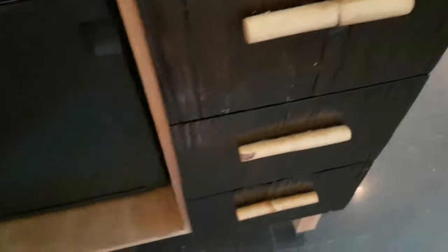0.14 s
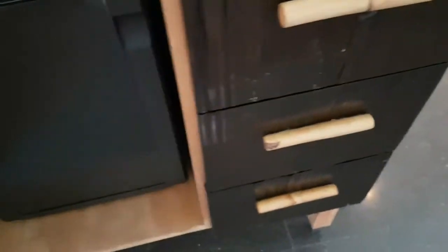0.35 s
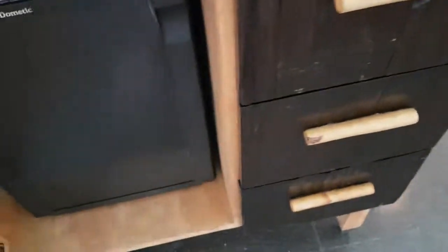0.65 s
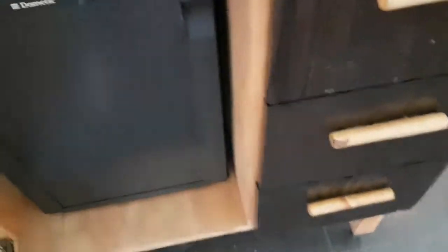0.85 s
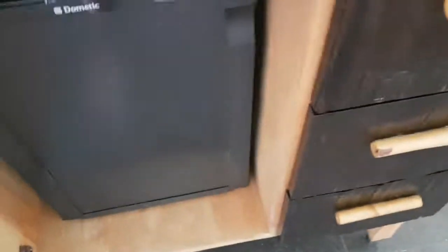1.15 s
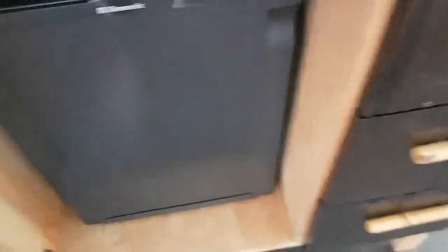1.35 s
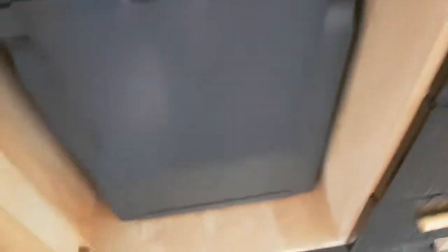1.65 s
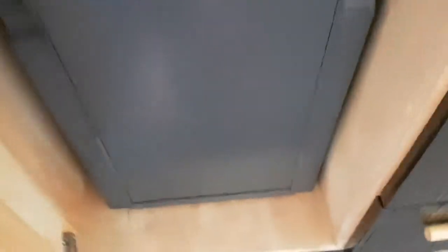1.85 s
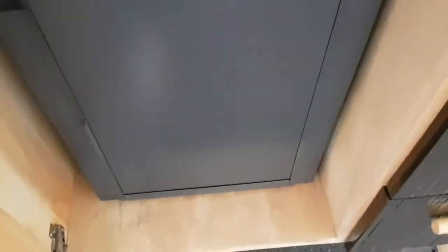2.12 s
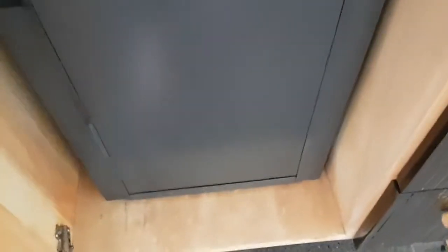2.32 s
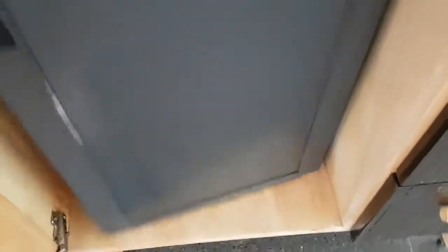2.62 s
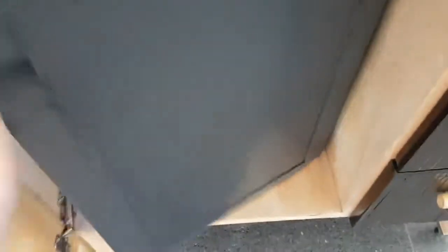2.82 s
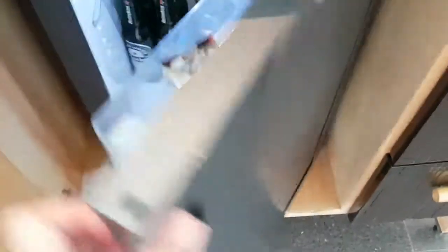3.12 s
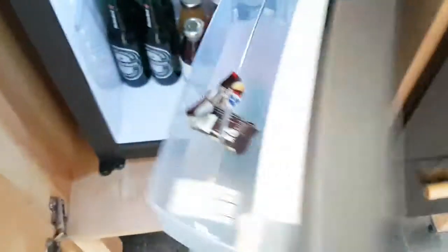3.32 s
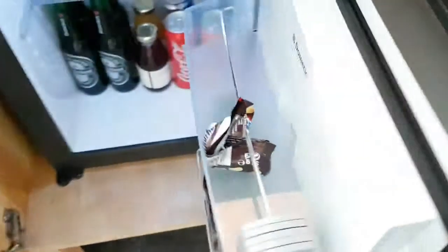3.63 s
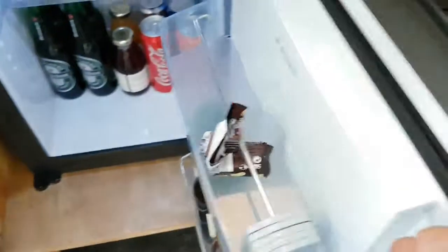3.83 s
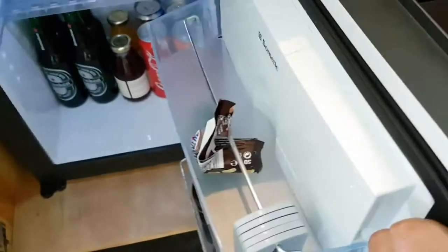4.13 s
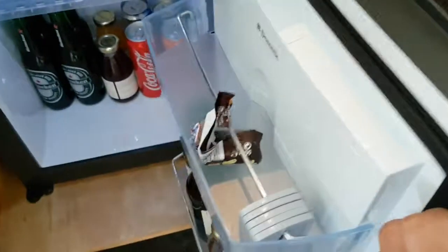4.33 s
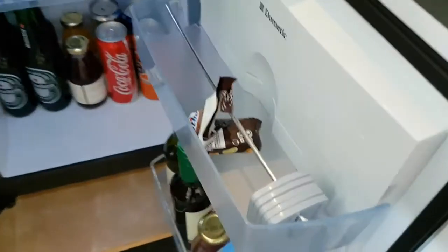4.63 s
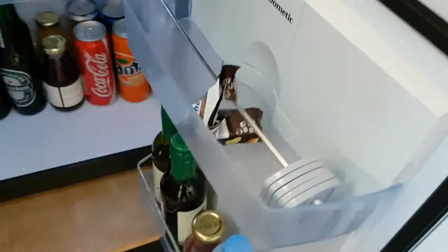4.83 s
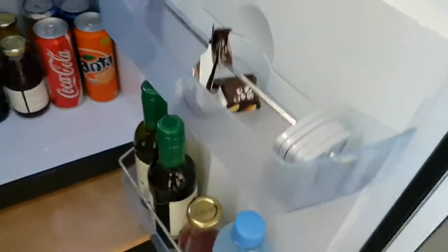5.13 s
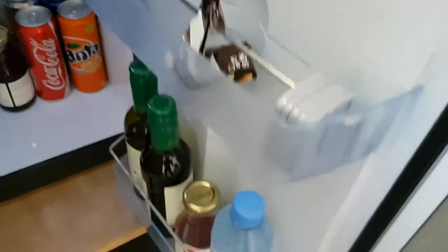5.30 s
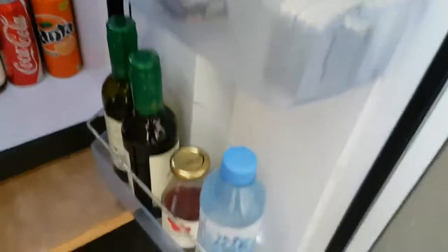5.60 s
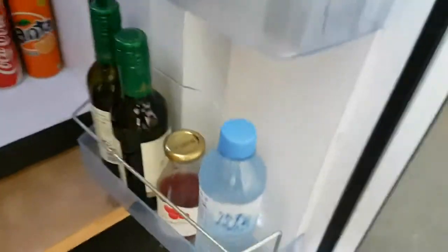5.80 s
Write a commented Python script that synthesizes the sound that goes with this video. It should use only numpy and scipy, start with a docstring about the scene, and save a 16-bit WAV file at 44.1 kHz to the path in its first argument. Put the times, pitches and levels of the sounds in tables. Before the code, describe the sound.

A small furnished room hushes quietly, with sleeve rustle and soft handling rumble close to a hand-held microphone. A hinge squeals faintly at the start and again near 0.9 seconds, where a wooden cabinet judders briefly and gives light knocks and clicks. A louder stuttering creak runs from 1.4 seconds and ends in a knock at 1.6. After another small knock at 2.5, a fridge's rubber seal peels with crackles and short rising squeaks, letting go with a hollow thump at 2.9. Glass bottles tinkle lightly just after, while a sleeve rustles with the swinging door. At about 4.1 seconds the plastic shelves rattle loudly as their load slides and bumps, and at 4.3 bottles meet in a bright, ringing clink. Soft sleeve swishes, a low puff of air and a few faint settling knocks follow, fading to the room's hush by about 6 seconds.

```python
"""First comes a faint hush with rustling sleeves and a thin hinge squeal, in a small furnished room.
A wooden cabinet judders as its wood sticks and slips, then knocks. The small fridge inside is pulled
open: its rubber seal peels, squeaks and lets go with a thump. The door swings out, glass bottles clink
and its plastic shelves rattle. Close by, handling and moving air rumble in hand-held microphones."""
import sys
import numpy as np
from scipy import signal
from scipy.fft import rfft, irfft, next_fast_len
from scipy.io import wavfile
from scipy.ndimage import uniform_filter1d

SR = 44100
rng = np.random.default_rng(int(sys.argv[2]) if len(sys.argv) > 2 else 0)


def log_audio(samples):
    """Write samples as a 16-bit WAV file to the path given in sys.argv[1]."""
    # one column per channel
    frames = np.atleast_2d(samples).T
    # limit to full scale, then quantise
    limited = np.clip(frames, -1, 1)
    pcm = np.round(limited * 32767).astype(np.int16)
    wavfile.write(sys.argv[1], SR, pcm)


N = 262819
TIME = np.arange(N) / SR


def amp(db):
    """Turns decibels into a gain."""
    return 10 ** (np.asarray(db) / 20)

def evened(x):
    """Scales a signal to an average (rms) level of 1."""
    return x / np.sqrt(np.mean(x ** 2) + 1e-20)

def read(points, hz):
    """Looks up a table at any pitch, gliding between its rows."""
    pitch_hz, value = np.transpose(points)
    return np.interp(np.log(hz + 1), np.log(pitch_hz + 1), value)

def add(mix, start_s, sound):
    """Mixes in a stereo sound at the given time."""
    part = mix[:, max(round(start_s * SR), 0):][:, :sound.shape[1]]
    part += sound[:, :part.shape[1]]

def colour(x, tone, size=4096):
    """Makes each pitch louder or softer as a tone table says, with no ringing ahead of the sound."""
    log_gain = np.log(amp(np.maximum(read(tone, abs(np.fft.fftfreq(size, 1 / SR))), -90)))
    taps = np.fft.ifft(np.exp(np.conj(signal.hilbert(log_gain)))).real
    return signal.oaconvolve(x, taps[None, :size // 2], axes=1)[:, :x.shape[1]]

def swells(rows):
    """A loudness curve of smooth humps, each rising and falling at its own pace."""
    humps = (amp(db) * np.exp(-((TIME - peak_s) / np.where(TIME < peak_s, rise_s, fall_s)) ** 2)
             for peak_s, db, rise_s, fall_s in rows)
    return np.sqrt(sum(hump ** 2 for hump in humps))

# How alike left and right sound (1 is the same): pitch_hz, likeness
STEREO_LIKENESS = [(30, 0.9), (150, 0.99), (350, 0.9), (750, 0.57), (1200, 0.035), (2800, 0.11), (5000, 0)]
def mic_pair(x):
    """Blends two unrelated signals as two microphones hear: alike in the bass, unlike in the treble."""
    size = next_fast_len(x.shape[1])
    first, second = rfft(x, size)
    same = np.clip(read(STEREO_LIKENESS, np.fft.rfftfreq(size, 1 / SR)), -1, 1)
    mid, side = first * np.sqrt((1 + same) / 2), second * np.sqrt((1 - same) / 2)
    return irfft(np.array([mid + side, mid - side]), size)[:, :x.shape[1]]

def noise(size=N):
    """Plain stereo hiss."""
    return mic_pair(rng.standard_normal((2, size)))

def patter(tone, per_s, spread_db):
    """Tiny snaps at random moments; spread_db makes their sizes uneven."""
    sizes = amp(spread_db * np.minimum(rng.exponential(1, (2, N)), 4)) * rng.choice([-1, 1], (2, N))
    snaps = sizes * (rng.random((2, N)) < per_s / SR)
    return evened(colour(mic_pair(snaps), tone))

def dying_noise(fade_times, size, bands=12):
    """Hiss whose bands die at their own speeds. A fade time, fade_s, is how long a 60 dB drop takes."""
    spectrum, t = rfft(noise(size)), np.arange(size) / SR
    centres_hz, out = np.geomspace(80, 16000, bands), 0
    for hz, mask in zip(centres_hz, np.eye(bands)):
        share = read(np.c_[centres_hz, mask], np.fft.rfftfreq(size, 1 / SR))
        band = irfft(spectrum * share, size) * amp(-60 * t / read(fade_times, hz))
        out = out + evened(band) * np.sqrt(share.mean() / size)
    return out

def ring(notes, t):
    """The fading notes of a struck object; high ones reach the two microphones out of step."""
    hz, db, fade_s = np.transpose(notes)[:, :, None]
    lag = np.arccos(np.clip(read(STEREO_LIKENESS, hz), -1, 1)) * rng.choice([-.5, .5], hz.shape)
    gain = rng.choice([-1, 1], hz.shape) * amp(db - 60 * t / fade_s) * (1 - np.exp(-t / .0005))
    return np.array([(gain * np.cos(2 * np.pi * hz * t + side * lag)).sum(0) for side in (-1, 1)])

def onset_level(x):
    """Average (rms) level of the first 12.5 ms."""
    return np.sqrt(np.mean(x[:, :SR // 80] ** 2))

def strikes(rows, tone, notes, bass_fade_s, treble_fade_s, crack, contact_s, notes_db, size=12288):
    """Each blow is a crack, a short noisy ring and the object's notes, with three band levels."""
    out, t = np.zeros((2, N)), np.arange(size) / SR
    bands = [signal.butter(3, edges_hz, "bandpass", fs=SR, output="sos")
             for edges_hz in ((70, 400), (400, 3000), (3000, 17000))]  # bass, middle, treble
    fade_times = [(150, bass_fade_s), (5000, treble_fade_s)]
    body = dying_noise(fade_times, size)
    for start_s, *levels_db in rows:
        blow = evened(body + dying_noise(fade_times, size))  # half changes with the spot that is hit
        scrape = noise(size) * t * np.exp(-t / contact_s)  # softer contacts last longer
        blow = evened(colour(blow + crack * evened(scrape), tone))
        blow = blow + amp(notes_db) * evened(ring(notes, t))
        for band, db in zip(bands, levels_db):
            part = signal.sosfilt(band, blow)
            add(out, start_s, amp(db) * part / onset_level(part))
    return out

def squeak(hz, overtones_db, jitter):
    """Very fast sticking and slipping makes a wavering tone with overtones."""
    waver = 1 + jitter * evened(uniform_filter1d(rng.standard_normal(N), size=120))
    phase = 2 * np.pi * np.cumsum(hz * waver) / SR
    overtones = sum(amp(db) * np.sin(k * phase) for k, db in enumerate(overtones_db, 2))
    return evened(np.sin(phase) + overtones)


# Tone of the quiet room: pitch_hz, gain_db
HUSH_TONE = [(25, -23), (60, -8), (120, -12.5), (190, -7), (290, 11), (400, -13), (750, -5), (1400, -17.5),
             (2300, -13), (3500, -22.5), (8000, -28.5), (15500, -21)]
def room_hush(level_db=-66):
    """The steady, dull hush of the room."""
    return amp(level_db) * evened(colour(noise(), HUSH_TONE))

# How strongly the hand moves: time_s, strength_db
HAND_MOTION = [(0.0, -54), (0.76, -54.5), (1.49, -51.5), (1.99, -49), (2.83, -44.5), (3.13, -63),
               (3.93, -64), (4.52, -53), (5.01, -53.5), (5.95, -68.5)]
# The arm swinging the door: peak_s, level_db, rise_s, fall_s
ARM_SWINGS = [(2.82, -38, 0.12, 0.18), (3.1, -52.5, 0.65, 0.71), (3.58, -56.5, 0.35, 0.34),
              (4.22, -48.5, 0.087, .55)]
# Tones of the handling rumble and the cloth: pitch_hz, gain_db
RUMBLE_TONE = [(15, -34), (25, -14), (97, 1.5), (162, 1.5), (193, -4.5), (221, -2), (379, -8.5),
               (414, -18.5), (500, -14), (650, -45.5), (1100, -120)]
RUSTLE_TONE = [(200, -16.5), (420, 1), (700, -1), (1300, -8), (2100, -7.5), (3200, -18), (4500, -19),
               (6500, -27), (8500, -25.5), (11000, -33), (15500, -34)]
def handling():
    """The hand makes the microphones rumble; the sleeve rustles with it and as the arm swings."""
    hand_db = np.interp(TIME, *np.transpose(HAND_MOTION))
    rumble = amp(hand_db - 1) * evened(colour(noise(), RUMBLE_TONE))
    sleeve_gain = np.hypot(amp(-31.5 + 0.51 * hand_db), swells(ARM_SWINGS))
    return rumble + sleeve_gain * patter(RUSTLE_TONE, per_s=4000, spread_db=0)

# Squeals of the hinge: peak_s, level_db, rise_s, fall_s
HINGE_SQUEALS = [(.14, -56.5, 0.007, 0.1), (.875, -52, 0.063, .045)]
def hinge():
    """The hinge sticks and slips fast enough to squeal faintly."""
    return swells(HINGE_SQUEALS) * squeak(hz=816, overtones_db=[-18], jitter=0.064)

# Strokes of the sleeve: peak_s, half_length_s, level_db
SLEEVE_STROKES = [(0.586, 0.043, -65.5), (0.678, 0.041, -61.5), (2.167, 0.072, -66), (3.44, 0.12, -66),
                  (4.576, 0.068, -51.5), (4.722, 0.057, -49.5), (5.518, 0.024, -65)]
# Tone of a swish: pitch_hz, gain_db
SWISH_TONE = [(1500, 8), (2500, 7.5), (4500, 3), (8000, 1), (12000, -3.5), (15500, -3)]
def sleeve_swishes():
    """The sleeve brushes by in short, hissy strokes."""
    strokes = swells([(peak_s, db, half_s, half_s) for peak_s, half_s, db in SLEEVE_STROKES])
    return strokes * patter(SWISH_TONE, per_s=7000, spread_db=-4)

def slips(start_s, end_s, gap_s, growth, onset_db, peak_s, bass_db, middle_db, treble_db, count=20):
    """Lists the blows of one judder: they come ever more slowly as their force swells and fades."""
    times_s = start_s + np.r_[0, np.cumsum(gap_s * (1 + growth) ** np.arange(count))]
    force_db = onset_db * np.exp(-(times_s - start_s) / 0.015)  # the onset soon wears off
    force_db -= 6 * ((times_s - peak_s) / 0.079) ** 2  # weaker away from the peak
    force_db += 0.56 * rng.standard_normal(len(times_s))
    treble_change_db = 1.5 * force_db  # weak slips are duller
    blows = np.c_[times_s, bass_db + force_db, middle_db + force_db, treble_db + treble_change_db]
    return blows[times_s < end_s]

# Runs of slipping wood: start_s, end_s, first_gap_s, gap_growth_per_slip, onset_db, peak_s,
# bass_db, middle_db, treble_db
CABINET_JUDDERS = [(.840, .925, .0168, .06, 3.5, 0.925, -50.5, -39, -43),
                   (1.402, 1.573, .0112, .033, -7.5, 1.4745, -33, -31, -45)]
# Single knocks: start_s, bass_db, middle_db, treble_db
CABINET_KNOCKS = [(.930, -40, -34, -50), (.953, -48, -44, -52.5), (1.134, -40.5, -47, -53.5),
                  (1.196, -42.5, -57, -59), (1.372, -45.5, -69, -80), (1.590, -32, -29, -40),
                  (2.518, -39.5, -44, -53)]
# Tone of the wood: pitch_hz, gain_db
CABINET_TONE = [(60, -22), (110, -8), (155, -6.5), (260, -12.5), (520, -9.5), (810, 0), (1100, -10),
                (1450, -9), (1750, -14.5), (2400, -21), (3100, -38), (6000, -48.5), (15000, -60)]
# Notes the wood rings at: pitch_hz, level_db, fade_s
CABINET_NOTES = [(156, -4, .2), (217, -8, .14), (330, -7, .12), (517, -4, .16), (820, 0, .15)]
def cabinet():
    """Wood sticks and slips about 50 to 90 times a second, then knocks against its stop."""
    blows = np.vstack([slips(*row) for row in CABINET_JUDDERS])
    judder = strikes(blows, CABINET_TONE, CABINET_NOTES, bass_fade_s=0.06, treble_fade_s=0.09,
                     crack=1.2, contact_s=0.001, notes_db=-6)
    knocks = strikes(CABINET_KNOCKS, CABINET_TONE, CABINET_NOTES, bass_fade_s=0.062, treble_fade_s=0.13,
                     crack=1.0, contact_s=0.0012, notes_db=-6)
    return judder + knocks

# Clicks of hinge and seal: start_s, bass_db, middle_db, treble_db
DOOR_CLICKS = [(1.069, -54, -46.5, -57), (1.076, -44.5, -42.5, -43.5), (2.621, -70, -67, -69),
               (2.644, -54, -57, -40.5), (2.658, -49, -63, -60)]
# Tone of a click: pitch_hz, gain_db
CLICK_TONE = [(60, -16), (160, -2), (600, -10), (1300, -6), (2200, -4), (3000, -11), (4300, -8),
              (8000, -16), (15000, -22)]
# Notes of the hinge and door edge: pitch_hz, level_db, fade_s
CLICK_NOTES = [(165, -2, .15), (1380, -6, .06), (2250, 0, .06), (4300, -3, .04)]
def door_clicks():
    """Hinge and seal give small, sharp clicks that ring briefly."""
    return strikes(DOOR_CLICKS, CLICK_TONE, CLICK_NOTES, bass_fade_s=0.29, treble_fade_s=0.095,
                   crack=0.51, contact_s=0.00084, notes_db=-8)

# Two pulls that peel the seal: peak_s, strength_db, rise_s, fall_s
SEAL_PULLS = [(2.698, -29, 0.048, 0.041), (2.782, -29.5, 0.017, 0.051)]
# Tone of peeling rubber: pitch_hz, gain_db
SEAL_TONE = [(180, -48), (300, -2), (348, -10), (509, -9.5), (685, -2.5), (937, -13.5), (1160, -4.5),
             (2170, -12), (3280, -22), (4070, -16.5), (6570, -28), (8140, -23), (15500, -32)]
# Rubber squeaks: peak_s, level_db, rise_s, fall_s, pitch_hz (at the peak)
SEAL_SQUEAKS = [(2.663, -35.5, .008, 0.01, 1420), (2.707, -38, .01, 0.018, 1202),
                (2.786, -39, .015, 0.011, 1095), (2.873, -37.5, .065, 0.014, 1110)]
def seal(fizz_gain=1.08, climb_hz_per_s=1300):
    """Sticky rubber tears from the frame in tiny snaps; its squeaks climb in pitch as it stretches."""
    crackle = patter(SEAL_TONE, per_s=3000, spread_db=2.5)
    fizz = signal.sosfilt(signal.butter(2, 3500, "highpass", fs=SR, output="sos"), crackle)
    coarse = signal.sosfilt(signal.butter(2, 3500, fs=SR, output="sos"), crackle)
    out = amp(-2.5) * (coarse - fizz_gain * fizz) * swells(SEAL_PULLS)
    for peak_s, db, rise_s, fall_s, hz in SEAL_SQUEAKS:
        pitch_hz = hz + climb_hz_per_s * np.clip(TIME - peak_s, -2 * rise_s, 2 * fall_s)
        gain = swells([(peak_s, db, rise_s, fall_s)])
        out += gain * squeak(pitch_hz, overtones_db=[-5, -18, -24], jitter=0.024)
    return out

# Jolts of the fridge door: start_s, bass_db, middle_db, treble_db
DOOR_JOLTS = [(2.686, -31.5, -36, -48), (2.708, -52, -39.5, -49), (2.736, -31.5, -35.5, -57),
              (2.745, -35.5, -37.5, -61), (2.8805, -28, -28.5, -30.5), (2.884, -40, -26.5, -36),
              (2.893, -49, -34.5, -48)]
# Tone of the door: pitch_hz, gain_db
DOOR_TONE = [(35, -49), (60, -43), (390, 3.5), (1130, -6), (1300, -7.5), (2260, -4), (2530, -21),
             (3580, -20.5), (4950, -31.5), (8230, -35), (15000, -45)]
# Notes the door rings at: pitch_hz, level_db, fade_s
DOOR_NOTES = [(213.4, 0.5, 0.15), (359.5, 7, 0.1), (420, 2, 0.077)]
def door_thumps():
    """The hollow fridge door thumps as the seal lets go."""
    return strikes(DOOR_JOLTS, DOOR_TONE, DOOR_NOTES, bass_fade_s=0.019, treble_fade_s=0.042,
                   crack=1.1, contact_s=0.00027, notes_db=-1.5)

# Bottle hitting bottle, with each part's strength: start_s, tall_db, small_db, clash_db
BOTTLE_CLINKS = [(2.882, -46, -60, -55), (2.936, -40, -60, -52), (3.009, -41, -59, -52),
                 (3.046, -44, -68, -62), (3.6, -59, -74, -62), (3.643, -56, -76, -70),
                 (4.314, -22.5, -23, -28), (4.336, -41, -35, -35)]
# Notes of the two bottles: pitch_hz, level_db, fade_s
TALL_NOTES = [(1953, -6.5, .62), (1978, -4.5, .4), (2019, -4.5, .36), (2083, -12, .6), (2164, -14, .25),
              (3172, -20, .45), (4680, -15, .33), (6019, -23, .2), (6180, -20, .2), (7908, -18, .2)]
SMALL_NOTES = [(3138, -9, .19), (3180, -8, .22), (3486, -3, .16), (3526, -1, .22), (3531, -8, .3),
               (4430, -19, .26), (5521, -13, .26), (7424, -19, .18), (9572, -24, .12), (9749, -24, .25),
               (11340, -28, .22), (12520, -25, .22), (13650, -27, .2)]
# Tone of glass touching glass: pitch_hz, gain_db
CLASH_TONE = [(1000, -26.5), (2000, -11.5), (2600, -16), (3400, -4.5), (4000, -33), (4650, -1.5),
              (5200, -30), (6000, -9.5), (6800, -21), (7800, -11.5), (9000, -18.5), (15000, -21)]
def bottles(size=36864):
    """Glass meets glass with a short clash; notes close in pitch make the ringing wobble."""
    out, t = np.zeros((2, N)), np.arange(size) / SR
    for start_s, tall_db, small_db, clash_db in BOTTLE_CLINKS:
        clash = colour(dying_noise([(2000, 0.12), (12000, 0.17)], size), CLASH_TONE)
        ringing = amp(tall_db) * ring(TALL_NOTES, t) + amp(small_db) * ring(SMALL_NOTES, t)
        add(out, start_s, ringing + amp(clash_db - 2.5) * clash / onset_level(clash))
    return out

# Things knocking in the shelves: start_s, strength_db, hardness_db
SHELF_BUMPS = [(3.470, -51.5, -18), (3.796, -43, -6), (4.053, -27.5, 0), (4.066, -33.5, 9), (4.073, -29, 7),
               (4.099, -33, 3.5), (4.122, -38, 3.5), (4.135, -44, 5), (4.314, -31, -2.5),
               (4.345, -31.5, -18), (4.644, -45.5, -10), (4.678, -53.5, 8), (4.806, -50.5, -3),
               (5.147, -56, -13), (5.236, -66, -14)]
# Hollow notes of the shelves: pitch_hz, level_db, fade_s
SHELF_NOTES = [(565, -9, .14), (633, 0, .15), (736, -4, .16), (800, -7, .12), (1084, -6, .16),
               (1165, -3.5, .16), (1290, -4, .12), (1590, -7, .12), (2142, -12, .12), (2282, -13, .12)]
# Bottles sliding: peak_s, level_db, rise_s, fall_s
BOTTLE_SLIDES = [(4.075, -23.5, 0.023, 0.057), (4.342, -29, 0.032, 0.022)]
# Tones of a knock and a slide: pitch_hz, gain_db
SHELF_TONE = [(60, -25.5), (140, -22), (215, -6.5), (300, -26), (480, -18.5), (640, 22.5), (900, 23.5),
              (1250, 21), (2200, 10), (3300, -8.5), (4500, -8.5), (6000, -16), (15000, -26.5)]
SLIDE_TONE = [(200, -25.5), (480, -16.5), (620, 5.5), (760, -3.5), (1200, 0.5), (2300, -14), (5000, -22.5),
              (15000, -51)]
def shelves():
    """The door jerks to a halt and its load rattles, slides and settles in the plastic shelves."""
    start_s, strength_db, hardness_db = np.transpose(SHELF_BUMPS)
    middle_db = -42 + 0.2 * strength_db  # the middle range grows little with force
    blows = np.c_[start_s, strength_db, middle_db, strength_db + hardness_db]
    knocks = strikes(blows, SHELF_TONE, SHELF_NOTES, bass_fade_s=0.06, treble_fade_s=0.11,
                     crack=0.7, contact_s=0.0012, notes_db=-2)
    return knocks + swells(BOTTLE_SLIDES) * patter(SLIDE_TONE, per_s=2500, spread_db=4)

# A puff of air: peak_s, strength_db, rise_s, fall_s
AIR_PUFFS = [(4.52, -57, 0.098, 0.85)]
def air_puff():
    """Air pushes on the microphones as they dip, making a deep rumble."""
    deep_tone = [(20, -14), (45, 7.5), (75, 12.5), (130, 0.5), (300, -48)]  # pitch_hz, gain_db
    gusts = evened(colour(rng.standard_normal((2, N)), deep_tone))
    return swells(AIR_PUFFS) * (gusts + gusts[::-1] / 2)  # each side gets some of the other

# How long the room rings: pitch_hz, fade_s
ROOM_FADES = [(100, 0.86), (500, 0.42), (2000, 0.61), (6000, 0.52), (15000, 0.38)]
def room_echo(x, build_s):
    """A soft tail builds up as sound comes back from walls and furniture."""
    tail = dying_noise(ROOM_FADES, size=32768)
    t = np.arange(tail.shape[1]) / SR
    tail *= 1 - np.exp(-t / build_s)
    return signal.oaconvolve(x, tail, axes=1)[:, :N]

def scene():
    """Adds up all the sounds; cabinet and fridge parts each send their own share into the echo."""
    wood, door = cabinet(), door_thumps() + door_clicks()
    rattle, glass, rubber, squeals = shelves(), bottles(), seal(), hinge()
    into_room = amp(-6) * wood + amp(-10.5) * (door + rattle) + amp(-8.5) * glass + amp(-21) * rubber
    echo = room_echo(into_room, build_s=0.002)
    background = handling() + sleeve_swishes() + air_puff() + room_hush()
    return background + squeals + wood + door + rubber + glass + rattle + echo

# How much louder the left side is than the right: pitch_hz, difference_db
LEFT_OVER_RIGHT = [(300, 0), (600, -1), (1200, -3.5), (2300, -5), (4500, -5), (9000, -2), (15000, 1)]
def record(dry, top_hz=15800):
    """The right microphone hears more of the middle range; the very highest treble is cut off."""
    size = next_fast_len(N)
    lean_db = read(LEFT_OVER_RIGHT, np.fft.rfftfreq(size, 1 / SR)) * np.array([[.5], [-.5]])
    leaning = irfft(rfft(dry, size) * amp(lean_db), size)[:, :N]
    treble_cut = signal.firwin(401, top_hz, window=("kaiser", 9), fs=SR)
    return signal.oaconvolve(leaning, treble_cut[None], "same")


dry = scene()
out = record(dry)
log_audio(out)
```